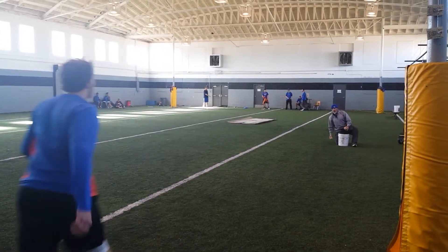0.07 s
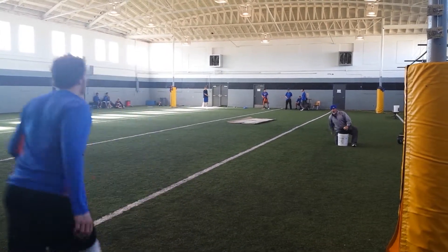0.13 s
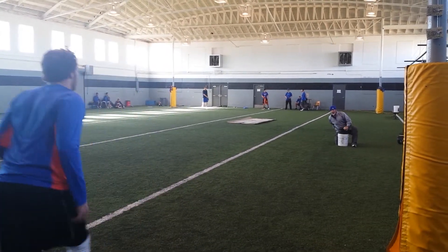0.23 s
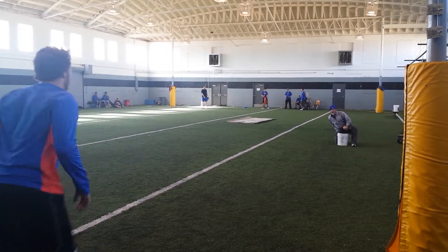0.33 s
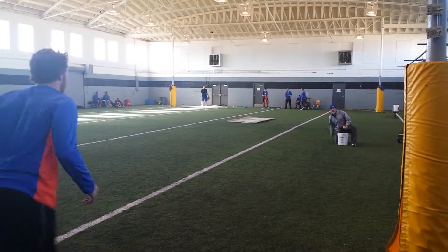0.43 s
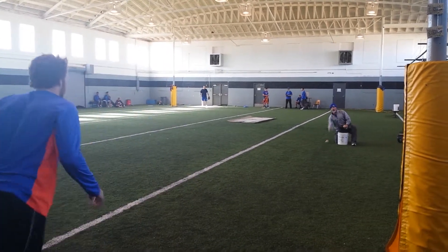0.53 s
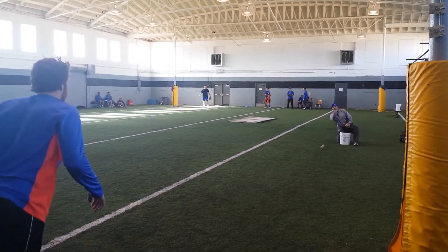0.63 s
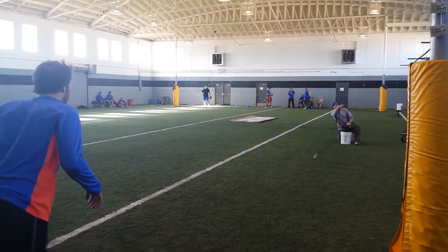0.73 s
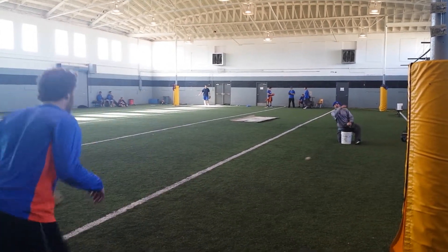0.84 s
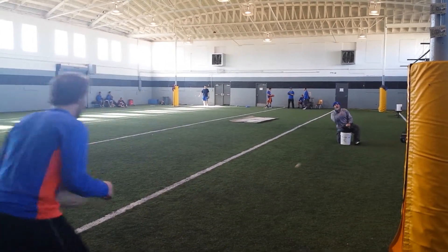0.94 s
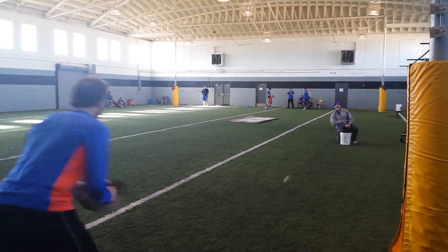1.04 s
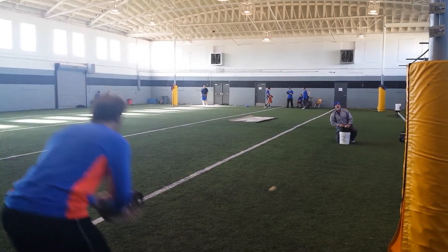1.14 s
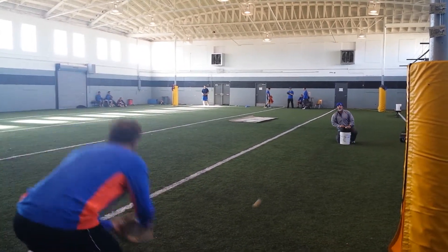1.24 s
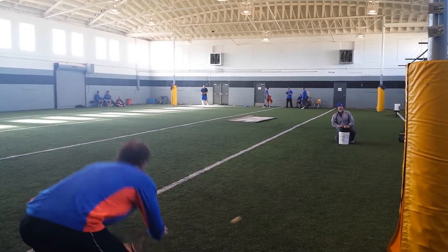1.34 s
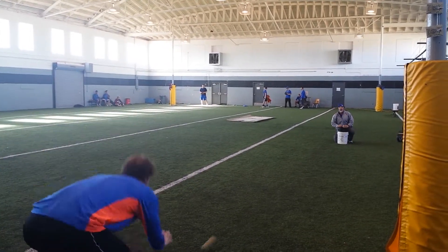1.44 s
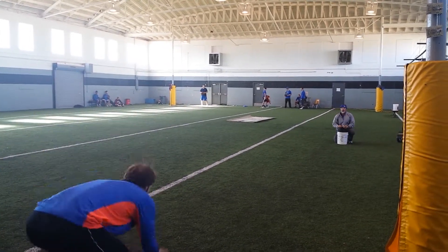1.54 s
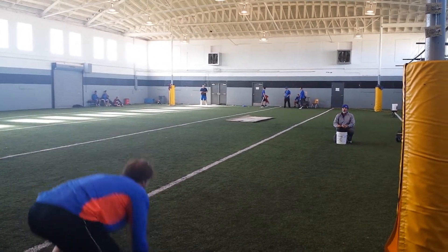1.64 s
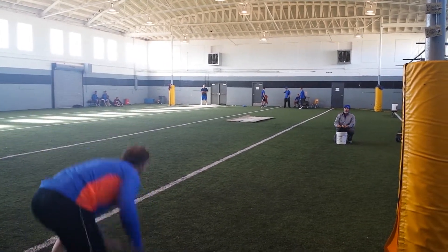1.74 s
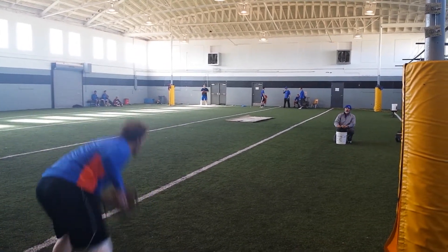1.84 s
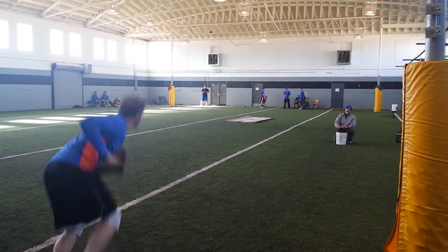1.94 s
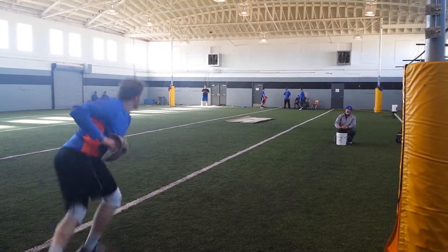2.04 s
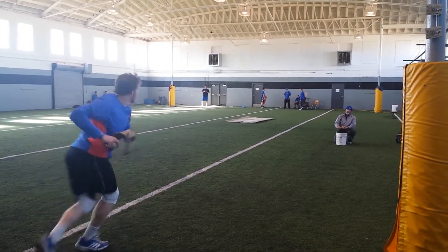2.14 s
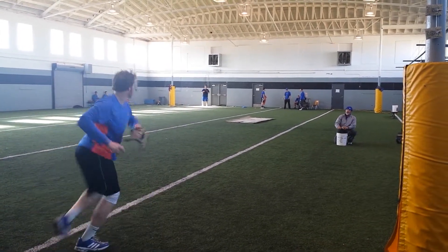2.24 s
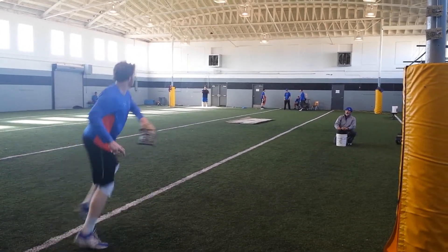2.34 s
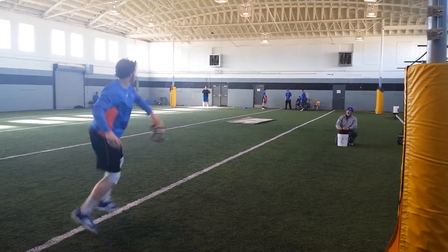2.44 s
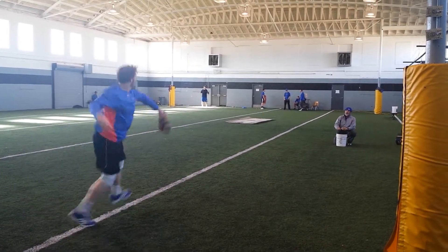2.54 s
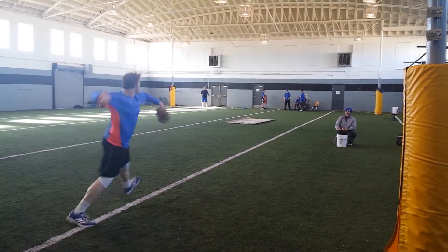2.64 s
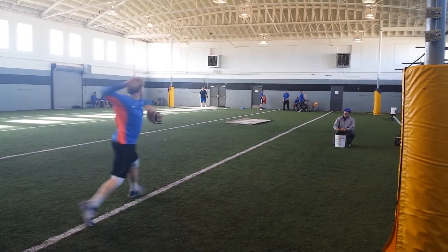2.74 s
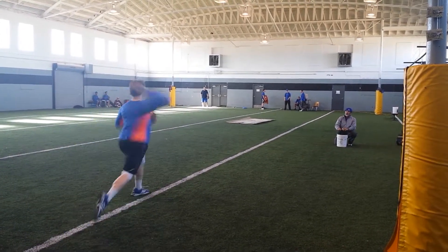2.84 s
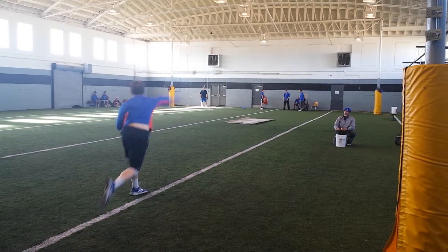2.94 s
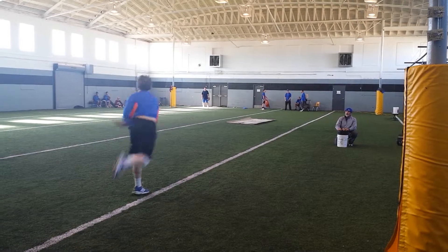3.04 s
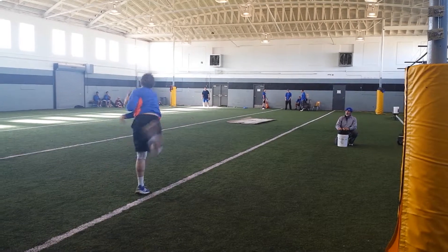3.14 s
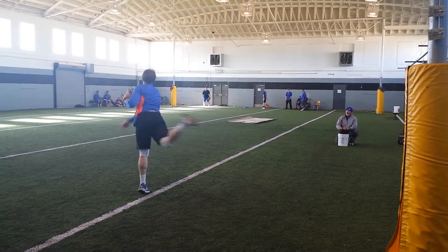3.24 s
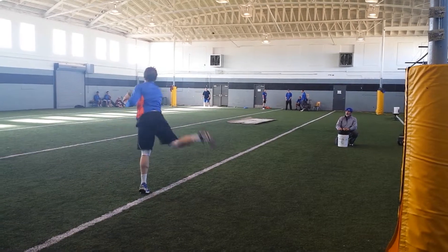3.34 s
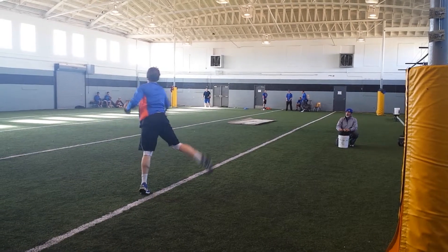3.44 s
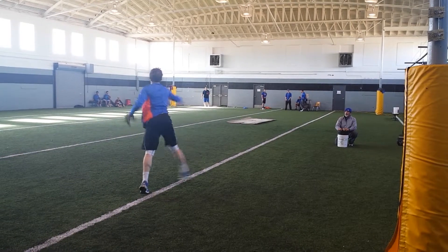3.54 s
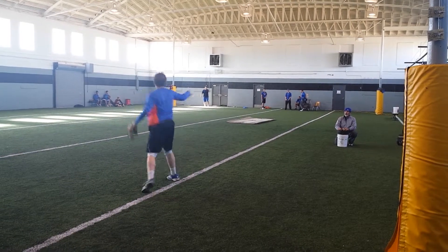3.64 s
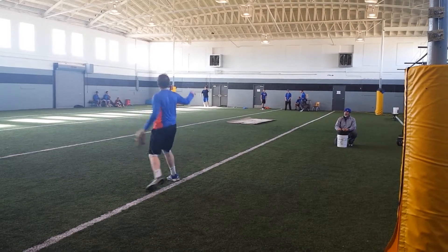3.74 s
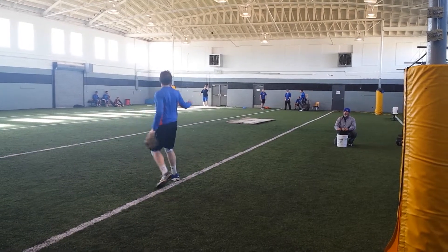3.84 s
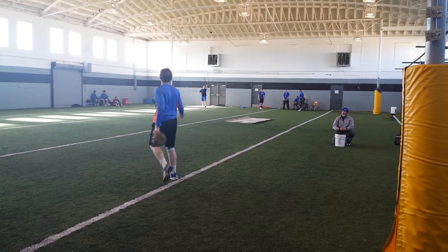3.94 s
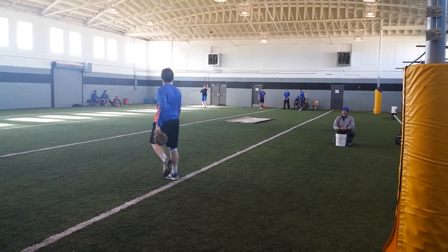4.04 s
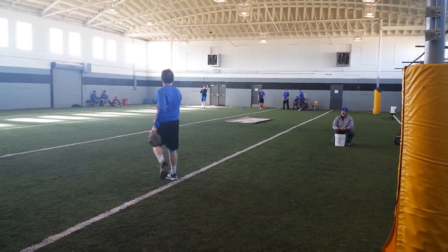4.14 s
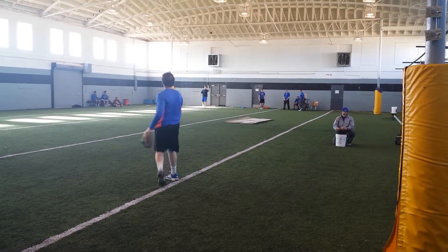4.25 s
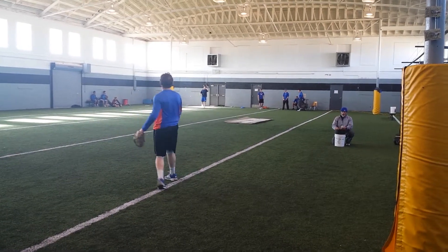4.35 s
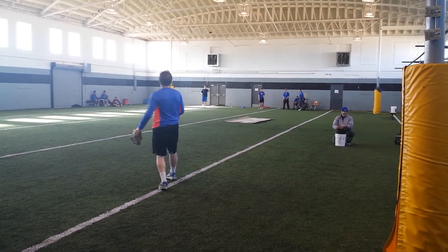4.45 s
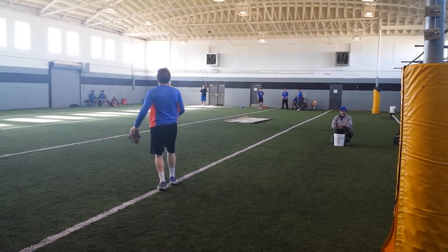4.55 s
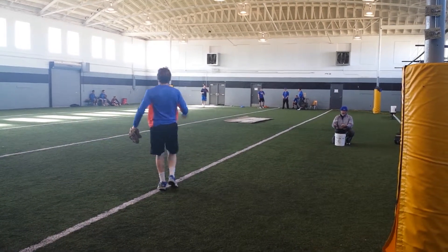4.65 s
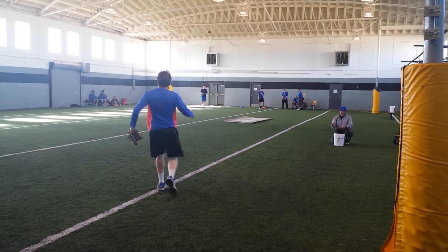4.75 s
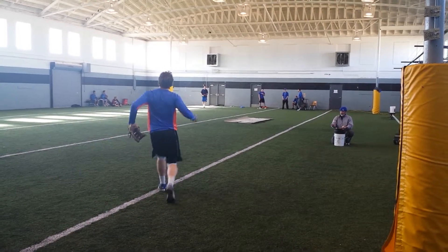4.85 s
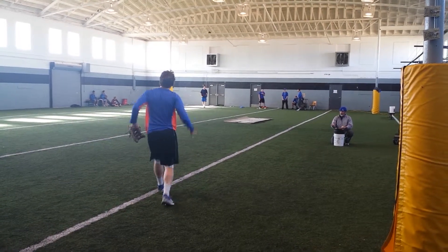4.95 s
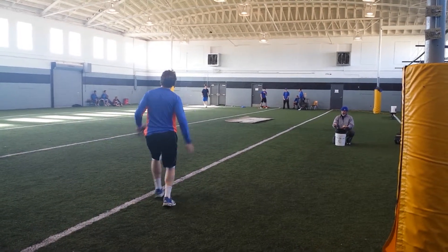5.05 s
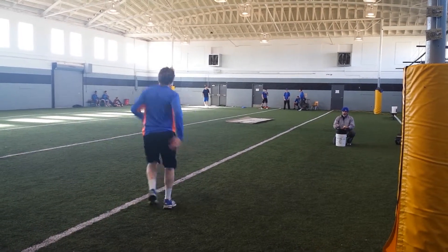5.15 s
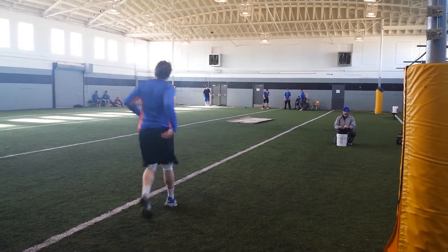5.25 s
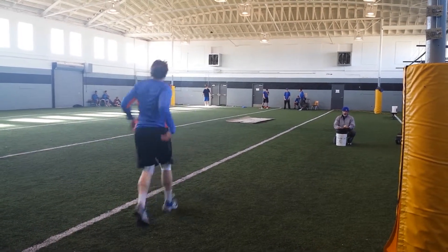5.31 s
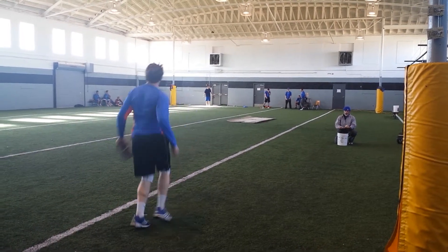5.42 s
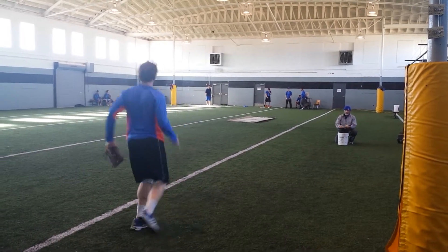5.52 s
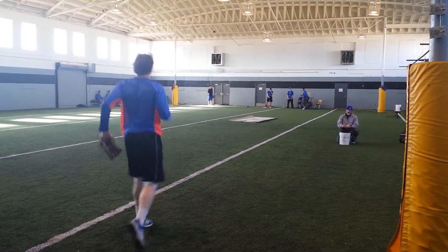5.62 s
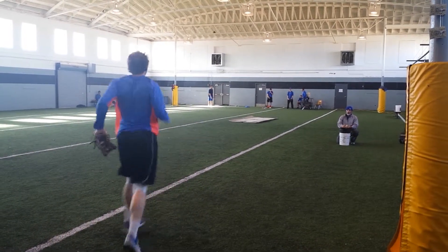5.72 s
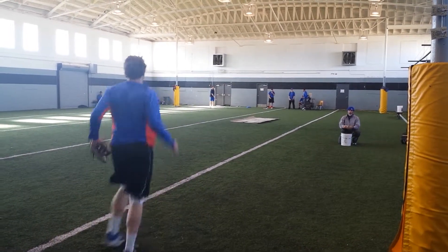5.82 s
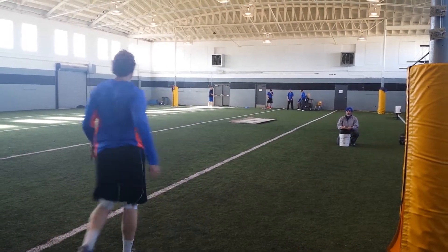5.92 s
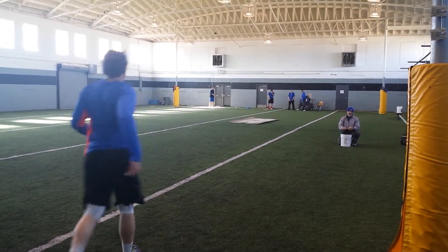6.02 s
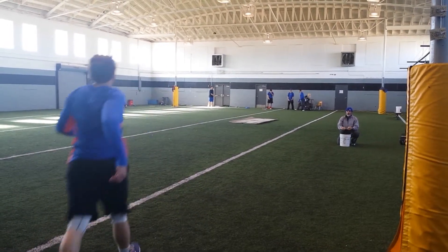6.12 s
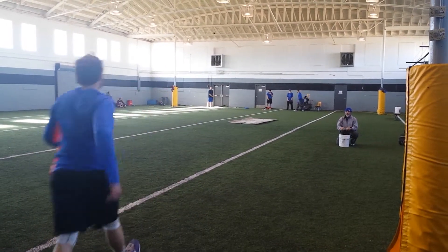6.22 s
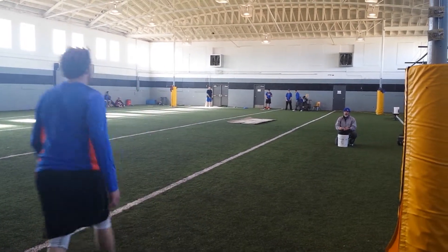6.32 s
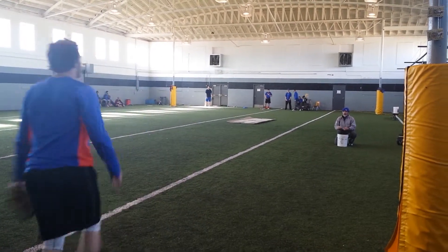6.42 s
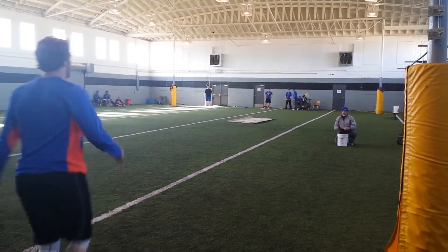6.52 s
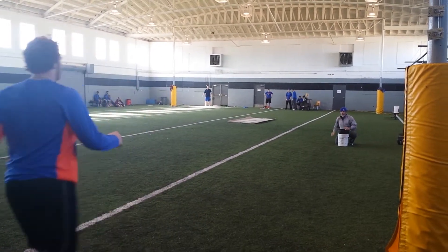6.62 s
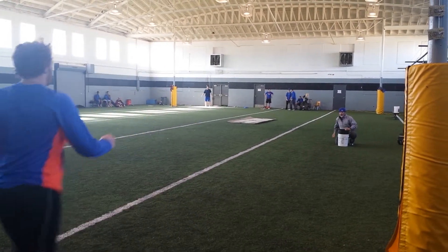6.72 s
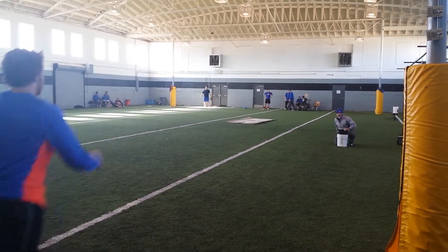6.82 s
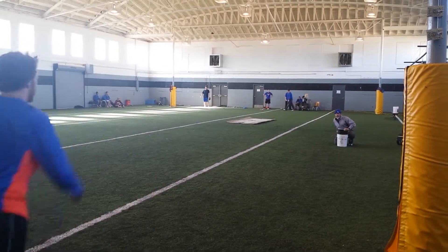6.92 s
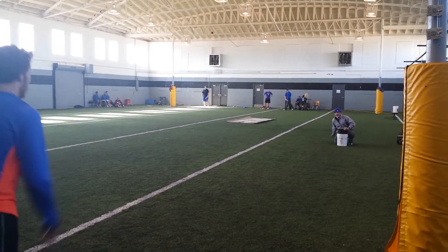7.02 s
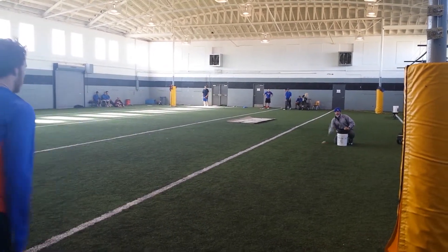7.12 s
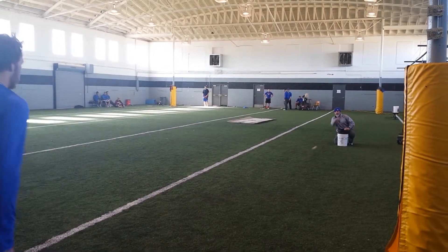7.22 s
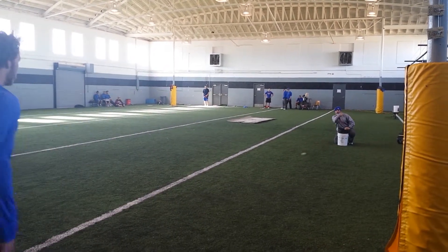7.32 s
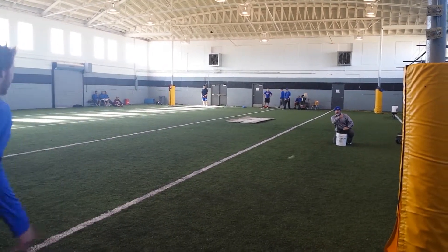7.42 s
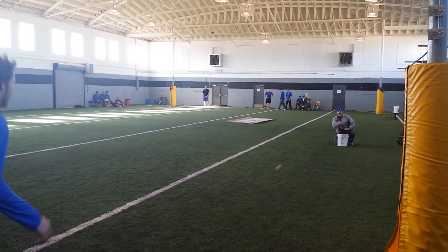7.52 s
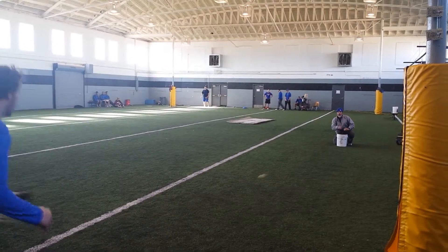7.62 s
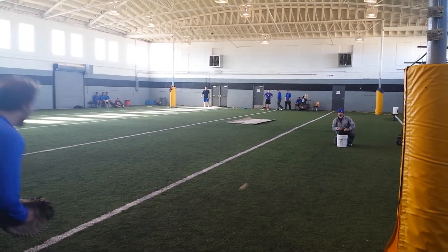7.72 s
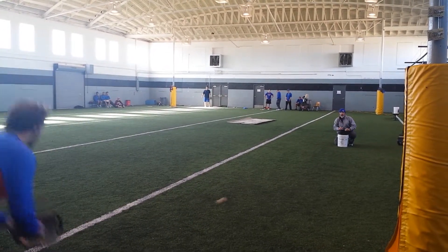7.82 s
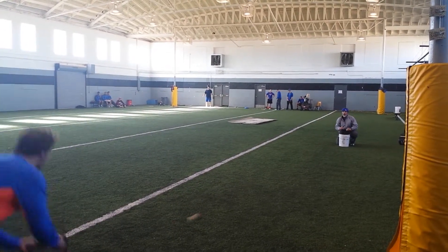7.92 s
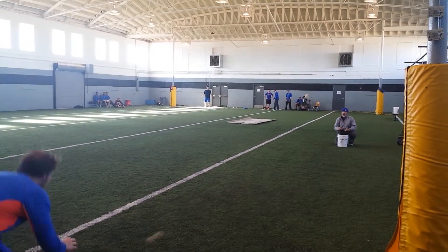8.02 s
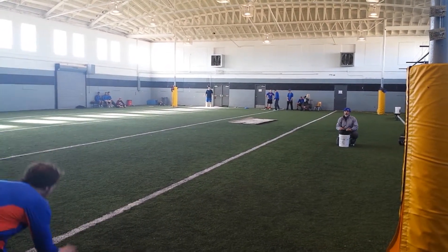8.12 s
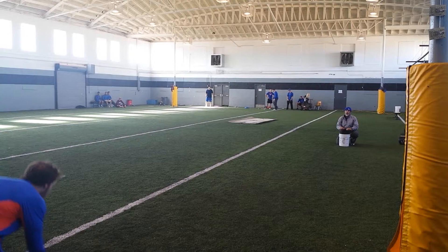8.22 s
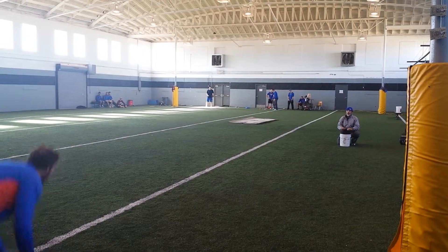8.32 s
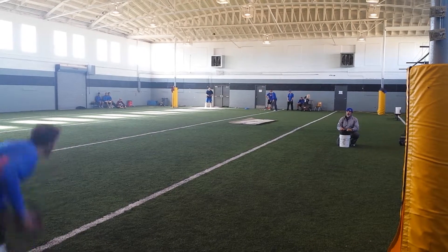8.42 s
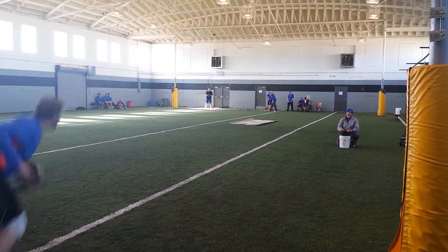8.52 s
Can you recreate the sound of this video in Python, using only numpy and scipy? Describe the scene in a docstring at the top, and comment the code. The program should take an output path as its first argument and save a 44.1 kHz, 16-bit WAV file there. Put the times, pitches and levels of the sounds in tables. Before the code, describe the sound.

Steady ventilation rush and low fan hum in a big hollow hall, shoes scuffing turf, balls hopping into a glove, one sharp echoing crack.

```python
"""Fielding practice on artificial turf in a big hollow hall, stereo.
Throughout, ventilation (filtered noise) rushes and a hum of three harmonics swells as if two fans beat.
Shoes scuff the turf from the start (bursts of tiny ticks); near 1.1 s a ball hops (struck modes and crushed
grass) and then slaps into a glove. At 4.1 s a pitch cracks into a mitt close by, echoes off walls and roof,
and makes the recorder's gain duck. Steps return near 7 s, and a second ball hops and is caught by 8.3 s."""
import sys
import numpy as np
from scipy import signal
from scipy.fft import rfft, irfft, next_fast_len
from scipy.io import wavfile
from scipy.ndimage import uniform_filter1d, minimum_filter1d

SR = 44100
rng = np.random.default_rng(int(sys.argv[2]) if len(sys.argv) > 2 else 0)


def inscribe(sig):
    """Save sig as 16-bit PCM at rate SR to the path in sys.argv[1].

    A 1-D sig is mono; a 2-D sig holds one channel per row.
    Samples are clipped to [-1, 1] before scaling.
    """
    pcm = np.round(np.clip(np.atleast_2d(sig).T, -1, 1) * 32767)
    wavfile.write(sys.argv[1], SR, pcm.astype(np.int16))


N = 377937
TIME = np.arange(N) / SR

# relative spectrum of turf scuffs and of the small ticks: frequency_hz, density_db (per Hz)
TURF_SPECTRUM = [(300, -23), (1000, 15), (3200, 15), (5000, 9.5), (7500, 11), (10000, -1.5), (13000, -9.5),
                 (15000, -22)]


def from_db(db):
    """Decibels are twenty times the logarithm of an amplitude ratio."""
    return 10 ** (np.asarray(db) / 20)


def rms_one(x):
    """Normalise to unit root-mean-square, the measure of mean power."""
    return x / np.sqrt(np.mean(x ** 2) + 1e-20)


def bins(size):
    """Frequencies (Hz) of a real Fourier transform, spaced by the inverse of its duration."""
    return np.maximum(np.arange(size // 2 + 1) * SR / size, 1)


def at_hz(points, hz):
    """Interpolate a table along logarithmic frequency, on which octaves are equal steps."""
    points = np.array(points)
    return np.interp(np.log(hz), np.log(points[:, 0]), points[:, 1])


def add(out, sound, s):
    """Superposition: pressures add, so a stereo sound is summed in at its start time."""
    start = int(s * SR)
    out[:, start:start + sound.shape[1]] += sound[:, :N - start]


def sides(db):
    """Interaural level difference, split evenly into left and right gains."""
    return from_db(np.array([[.5], [-.5]]) * db)


def arrival(hz, lead_ms):
    """Arrival-time difference as a phase turn; a positive lead reaches the left port first."""
    delay_ms = np.maximum([[-lead_ms], [lead_ms]], 0)
    return np.exp(-2j * np.pi * hz * delay_ms / 1000)


def treble_loss(hz, loss_db, corner_hz=1000):
    """Treble absorption: a gain falling by loss_db an octave above a corner (rising if negative)."""
    return from_db(-loss_db * np.log2(np.maximum(hz / corner_hz, 1)))


def resonance(hz, centre_hz, width):
    """Resonance curve of unit height; its half-width at half height is a share of the centre."""
    return 1 / (1 + ((hz - centre_hz) / (width * centre_hz)) ** 2)


def causal(gain):
    """Minimum phase, by folding the cepstrum: a response of this magnitude with nothing before the blow."""
    cepstrum = irfft(np.log(gain + 1e-9))
    half = len(cepstrum) // 2
    cepstrum[1:half] *= 2
    cepstrum[half + 1:] = 0
    return np.exp(rfft(cepstrum))


def ventilation(air_db=-28.5, lead_ms=0.2424):
    """Turbulence is broadband noise, here with coloured bands: part from the left, part from all round."""
    # relative spectrum of the rushing air: frequency_hz, density_db (per Hz)
    air_spectrum = [(20, -33), (40, -19.5), (55, -11), (85, -3), (105, 0), (122, 0.5), (170, -3), (200, -1),
                    (255, -5.5), (315, -6.5), (390, -9.5), (450, -11.5), (700, -14), (1000, -16.5),
                    (1300, -23), (1650, -20.5), (2050, -26.5), (3000, -41.5), (4200, -36.5), (5300, -34.5),
                    (5900, -31.5), (7000, -32), (8300, -40.5), (10300, -49.5), (11800, -61), (14000, -71.5)]
    # narrow hums and broad coloured bands in the rushing air: centre_hz,
    # width_hz (half-width at half amplitude), level_db
    air_bands = [(122.2, 2.6, -40), (291.5, 1.34, -42), (322, 1.5, -43), (366.4, 2.3, -44.5),
                 (388.6, 11, -44), (1890, 15, -57.5), (2125, 300, -50.5), (3144, 520, -52.5),
                 (6100, 140, -56), (6960, 60, -60.5), (10280, 420, -69.5)]
    # power share straight from the ducts on the left: frequency_hz, share (0-1)
    duct_share = [(100, 0.95), (400, 1), (700, 0.96), (1200, 0.67), (1750, 0.88), (2600, 0), (3300, 0.24),
                  (4800, 0), (6000, 0.72), (7400, 0), (9000, 0)]
    size = 2 * next_fast_len(N // 2 + 1)
    hz = bins(size)
    power = (from_db(air_db) * rms_one(from_db(at_hz(air_spectrum, hz)))) ** 2
    for centre_hz, width_hz, level_db in air_bands:
        band = rms_one(1 / (1 + ((hz - centre_hz) / width_hz) ** 2))
        power = power + (from_db(level_db) * band) ** 2
    share = np.clip(at_hz(duct_share, hz), 0, 1)
    white = rfft(rng.standard_normal((3, size)))
    direct = np.sqrt(share) * white[0] * arrival(hz, lead_ms)
    diffuse = np.sqrt(1 - share) * white[1:]
    return irfft((direct + diffuse) * np.sqrt(power))[:, :N]


def fan_hum():
    """Blade-passage harmonics under slow envelopes, heard as two fans drifting in and out of step."""
    # course of the hum: time_s, blade_rate_hz, then blade tone, second and third harmonic
    # before weighting: first_db, second_db, third_db
    hum_course = [(0.1, 72.0, -35, -29.5, -41), (0.17, 71.7, -39, -34.5, -28),
                  (0.96, 72.7, -41, -34.5, -40), (1.24, 71.5, -37, -42, -38), (1.31, 66.9, -39, -34, -39),
                  (1.47, 66.9, -35, -33, -35.5), (1.63, 71.6, -36, -34.5, -32),
                  (2.19, 71.9, -34.5, -32.5, -32), (3.12, 74.1, -29.5, -27, -43.5),
                  (3.38, 72.9, -30, -27, -37.5), (3.96, 73.0, -33, -35, -34), (4.38, 71.5, -29.5, -29, -35),
                  (4.66, 72.2, -35, -35.5, -39.5), (5.54, 71.7, -39.5, -32.5, -30),
                  (6.31, 70.9, -37, -36, -38), (6.43, 72.5, -34, -29.5, -37.5),
                  (7.17, 71.9, -41, -33, -41.5), (7.73, 70.6, -39, -33.5, -44),
                  (8.38, 72.0, -35.5, -38.5, -32.5), (8.45, 71.6, -34, -34, -34)]
    # weights of the three harmonics: weight_db
    harmonic_weights = (-1, -1, -2)
    time_s, *columns = np.transpose(hum_course)
    blade_hz, *levels_db = [np.interp(TIME, time_s, column) for column in columns]
    phase = 2 * np.pi * np.cumsum(blade_hz) / SR
    hum = 0
    for harmonic, (weight_db, level_db) in enumerate(zip(harmonic_weights, levels_db), 1):
        # the root of two makes the decibels root-mean-square levels
        hum = hum + np.sqrt(2) * from_db(weight_db + level_db) * np.sin(harmonic * phase)
    return hum


def light_steps(gap_s=0.52, jitter_s=0.021):
    """Gait is nearly periodic: faint scuffs at an uneven walking pace; rows as for the scuffs."""
    # spells with the fielder near: start_s, end_s
    footwork = [(0.449, 2.7), (7.0, 7.8)]
    level_db, half_s, loss_db, ring_db = -49, 0.013, -3, 0
    return [(s + jitter_s * rng.standard_normal(), level_db, half_s, loss_db, ring_db)
            for start_s, end_s in footwork for s in np.arange(start_s, end_s, gap_s)]


def scuffs(grain_db=2.0, pan_db=1.5, clump_db=2.5, flicks_per_s=9000):
    """Friction as random impulses: grass blades flick past a sole in clumps; a hard plant rings the sole."""
    # shoes brushing the turf: centre_s, level_db (before the swell), half_s (of the swell),
    # loss_db (per octave of treble), ring_db (of the sole)
    brushes = [(0.13, -41, 0.049, 4, 0), (0.843, -44, 0.017, -1, 7), (1.354, -40.5, .0081, -0.5, 4),
               (1.551, -36, 0.01, 0, 7), (1.887, -39.5, 0.036, -2.5, -2), (2.165, -46, .017, -3, -4),
               (2.887, -44, 0.044, 1, -6), (3.009, -40.5, 0.016, 1, -2), (7.413, -44, 0.012, 0, 10),
               (7.807, -33, 0.0087, 0.5, -5), (7.88, -44.5, 0.03, -5, 6), (8.013, -41, 0.014, -1, 8),
               (8.149, -41, 0.013, -2.5, 1), (8.254, -42.5, 0.014, -1, 4), (8.33, -46, 0.024, 5, 0),
               (8.518, -40.5, 0.055, -4, -2)]
    out, hz = np.zeros((2, N)), bins(size=16384)
    t = np.arange(2 * (len(hz) - 1)) / SR
    knots = np.arange(0, t[-1], .002)
    sole = sum(resonance(hz, mode_hz, width=0.12) for mode_hz in (3670, 6060))
    for centre_s, level_db, half_s, loss_db, ring_db in brushes + light_steps():
        clumps_db = clump_db * np.interp(t, knots, rng.standard_normal(len(knots)))
        grains_db = grain_db * np.minimum(rng.exponential(1, len(t)), 4)
        flicks = rng.standard_normal((2, len(t))) * from_db(clumps_db + grains_db)
        # only a random few samples hold a flick
        flicks *= rng.random(len(t)) < flicks_per_s / SR
        colour = from_db(at_hz(TURF_SPECTRUM, hz) + ring_db * sole) * treble_loss(hz, loss_db)
        swish = rms_one(irfft(rfft(flicks) * colour))
        start_s = max(centre_s - t[-1] / 2, 0)
        swell = np.exp(-.5 * ((start_s + t - centre_s) / half_s) ** 2)
        add(out, from_db(level_db) * sides(pan_db) * swish * swell, start_s)
    return out


def slap(colour, length_s, lead_ms, scatter, snap, pan_db=0):
    """Impact: a brief noisy crush, partly different at each port, with a pressure spike at full force."""
    rise_s = 0.00045  # time to full force
    shadow_hz = 2500  # above this the recorder's body shades the far port
    size = 2 * (len(colour) - 1)
    t, hz = np.arange(size) / SR, bins(size)
    force = np.minimum(t / rise_s, 1) * np.exp(-np.maximum(t - rise_s, 0) / length_s)
    crush = rng.standard_normal((3, size)) * force
    scatter = np.clip(scatter, 0, 1)
    ports = np.sqrt(1 - scatter) * crush[0] + np.sqrt(scatter) * crush[1:]
    ports[:, np.argmax(force)] += snap
    shadow = sides(pan_db * hz / np.hypot(hz, shadow_hz))
    sound = irfft(rfft(ports) * causal(colour) * arrival(hz, lead_ms) * shadow)
    return rms_one(sound) * np.sqrt(np.mean(force ** 2))


def knock(modes, favoured_hz, lift_db, lead_ms):
    """Modal excitation: damped modes struck together; the spot that is hit favours those near one pitch."""
    size = 4096
    t = np.arange(size) / SR
    ring = 0
    for mode_hz, level_db, t60_s in modes:
        strength = from_db(level_db + lift_db * resonance(mode_hz, favoured_hz, width=.17))
        decay = np.exp(-np.log(1000) * t / t60_s)
        ring = ring + strength * np.sin(2 * np.pi * mode_hz * t) * decay
    return irfft(rfft(ring) * arrival(bins(size), lead_ms))


def hall_tail(colour, build_s, grain_db, port_gap_ms=0.41, late_bass_hz=250):
    """Diffuse reverberation: builds up, bass last, and dies band by band; alike at both ports only in the bass."""
    # reverberation time of the hall: frequency_hz, t60_s
    hall_t60 = [(200, 0.82), (750, 2.57), (1600, 2), (3200, 0.97), (6500, 0.54), (13000, 0.23)]
    size = 2 * SR
    t, hz = np.arange(size) / SR, bins(size)
    knots = np.linspace(0, t[-1], num=500)
    clumps = rms_one(from_db(grain_db * np.interp(t, knots, rng.standard_normal(len(knots)))))
    mid, side = rfft(rng.standard_normal((2, size)) * clumps)
    # coherence of a diffuse field between two spaced ports
    alike = np.sinc(2 * hz * port_gap_ms / 1000)
    field = np.sqrt((1 + alike) / 2) * mid + np.sqrt((1 - alike) / 2) * side * [[1], [-1]]
    field *= rms_one(from_db(at_hz(colour, hz)))
    centres, out = np.geomspace(150, 14000, num=10), 0
    for centre_hz, weights in zip(centres, np.eye(len(centres))):
        band = irfft(field * np.interp(np.log(hz), np.log(centres), weights))
        band_build_s = build_s * (1 + late_bass_hz / centre_hz)
        build = 1 - np.exp(-np.square(np.square(t / band_build_s)))
        out = out + band * build * np.exp(-np.log(1000) * t / at_hz(hall_t60, centre_hz))
    return out


def ground_balls(room_db=-36.5, echo_db=-29.0, echo_length_s=0.0084, wall_loss_db=0.0):
    """Impact and reflection: hops and glove slaps each knock, crunch, echo off a wall and leave a faint tail."""
    # hops on the turf: start_s, knock_db, favoured_hz, lift_db, crunch_db, crunch_length_s,
    # crunch_peak_hz, crunch_lift_db, left_lead_ms, wall_delay_s
    hops = [(1.1266, -1, 750, 3.5, -20.5, 0.0031, 4470, 6, 0.11, 0.024),
            (7.8066, -4.5, 900, 5.5, -18, 0.0023, 2760, 3.5, 0.058, .029)]
    # slaps into the fielder's glove: columns as for the hops
    catches = [(1.6561, -2, 1930, 14, -18.5, 0.0019, 4270, 6, 0.374, .0268),
               (8.2815, -0.81, 1000, 8, -19, 0.0013, 2600, 12, 0.18, .0278)]
    # ball on turf: frequency_hz, level_db (before the favoured lift), t60_s
    hop_modes = [(370, -19, 0.018), (685, -17.5, 0.017), (840, -17, 0.025), (1630, -20, 0.0088)]
    # ball in the pocket of the glove: columns as for the turf
    glove_modes = [(363, -17, 0.016), (630, -10, 0.0099), (1030, -23.5, 0.02), (1860, -25.5, 0.022)]
    # relative spectrum of crushed grass or leather: frequency_hz, density_db (per Hz)
    crunch_spectrum = [(200, -18), (700, 8), (1400, 5), (2200, -2), (2800, 2.5), (3500, 1.5), (5200, -1),
                       (7600, 3.5), (10500, -18.5), (14000, -28)]
    # relative spectrum of the ball's wall echo and tail: frequency_hz, density_db (per Hz)
    ball_spectrum = [(80, -15), (250, -4), (600, 10.5), (1300, 3), (2500, -6), (3400, -5.5), (5300, -7),
                     (8000, -7), (10500, -23), (14000, -30)]
    out, hz = np.zeros((2, N)), bins(size=4096)
    tail = hall_tail(ball_spectrum, build_s=0.0038, grain_db=0.0)
    off_wall = from_db(at_hz(ball_spectrum, hz)) * treble_loss(hz, wall_loss_db)
    for rows, modes in ((hops, hop_modes), (catches, glove_modes)):
        for (start_s, knock_db, favoured_hz, lift_db, crunch_db, length_s,
             peak_hz, peak_db, lead_ms, wall_s) in rows:
            add(out, from_db(knock_db) * knock(modes, favoured_hz, lift_db, lead_ms), start_s)
            peak = peak_db * resonance(hz, peak_hz, width=.35)
            colour = from_db(at_hz(crunch_spectrum, hz) + peak)
            crunch = slap(colour, length_s, lead_ms, scatter=0.29, snap=1.5)
            add(out, from_db(crunch_db) * crunch, start_s)
            # the wall echo comes from nearly straight ahead
            echo = slap(off_wall, echo_length_s, lead_ms=0.028, scatter=0.24, snap=5.7)
            add(out, from_db(knock_db + echo_db) * echo, start_s + wall_s)
            add(out, from_db(knock_db + room_db) * tail, start_s)
    return out


def ticks(length_s=0.002, lift_db=15, width=0.091, lead_ms=0.027):
    """Short impulses, each peaked in one band: heel and ball touches, and a bright wall echo of the first catch."""
    # small ticks, the one at 1.6833 s being the wall echo: start_s, level_db, peak_hz
    small_ticks = [(1.5482, -29, 3900), (1.6633, -31, 4020), (1.6833, -27.5, 5900), (7.79, -33, 3500),
                   (7.812, -28, 2970), (8.3143, -38, 2700), (8.3264, -32, 2550)]
    out, hz = np.zeros((2, N)), bins(size=4096)
    for start_s, level_db, peak_hz in small_ticks:
        colour = from_db(at_hz(TURF_SPECTRUM, hz) + lift_db * resonance(hz, peak_hz, width))
        tick = slap(colour, length_s, lead_ms, scatter=0.49, snap=4.0)
        add(out, from_db(level_db) * tick, start_s)
    return out


def rafter_echoes(count=20, spread_pan_db=9.0, loss_db=1.0, peak_hz=2400, spread_octaves=0.54, lift_db=7.0):
    """Scattering by roof trusses: small echoes, unevenly spaced, fainter the later; rows as for the echoes."""
    first_s, last_s = .13, .42
    first_db, fade_db_per_s = -33, 30
    delays_s = first_s + (last_s - first_s) * (np.arange(count) + rng.random(count)) / count
    rows = []
    for delay_s, (tint, side) in zip(delays_s, rng.standard_normal((count, 2))):
        level_db = first_db - fade_db_per_s * (delay_s - first_s)
        tinted_hz = peak_hz * 2 ** (spread_octaves * tint)
        rows.append((delay_s, level_db, spread_pan_db * side, loss_db, tinted_hz, lift_db))
    return rows


def pitch_in_mitt(wash_db=-18.0, near_walls_db=-18.5, near_fade_s=0.025, far_wall_db=-23.0, far_wall_s=.205,
                  far_fade_s=0.3, echo_lead_ms=0.086):
    """Room impulse response: the crack, distinct echoes, near-wall boom, wash and a swell from the far end."""
    # crack straight and off the bare wall alongside: delay_s, level_db, loss_db (per octave of treble),
    # peak_hz, lift_db, left_lead_ms, pan_db (treble left minus right)
    crack_paths = [(0, -2, 0, 850, 5, -0.051, -6), (0.0151, -3, -1.5, 1910, 10, -0.326, 2)]
    # leather, then palm: after_s, level_db (within its path), length_s, loss_db (per octave of treble)
    contacts = [(0, 1, 0.00099, -1.5), (.0029, -8, 0.0028, 1.5)]
    # echoes off walls and roof: delay_s, level_db, pan_db (treble left minus right),
    # loss_db (per octave of treble), peak_hz, lift_db
    distinct_echoes = [(0.0225, -11, 4, 4, 800, 6), (.0348, -10.5, 9, 1, 3000, 6),
                       (.0432, -14.5, -3, 0, 3300, 3), (0.064, -20, 9, 0, 6500, 3),
                       (0.111, -16.5, 6, 3, 3100, 11), (.1395, -20.5, 8, 3, 6500, 9),
                       (.1555, -20, 1, 8, 800, 5), (.182, -21.5, 2, 7, 1700, 6),
                       (.2118, -17.5, -1, 3, 7200, 5), (0.2235, -19.5, 3, 10, 1500, 5),
                       (.2355, -19.5, 3, 6, 2000, 4), (0.2532, -16.5, 2, 6, 2100, 6),
                       (0.266, -21, 0, 8, 1800, 4), (.2825, -20.5, 0, 8, 1500, 3),
                       (.3085, -26, 0, 6, 3000, 4), (.329, -24.5, 1, 8, 1600, 5),
                       (.363, -27.5, 0, 8, 3000, 6), (.4305, -19, 1, 20, 750, 11),
                       (0.4532, -24, 3, 22, 1700, 9)]
    # relative spectra, each of frequency_hz, density_db (per Hz): leather pocket, crack as the walls
    # return it, boom off the near walls, wash of the hall, swell from the far end
    leather_spectrum = [(150, -22), (480, -11), (690, 13), (1000, 7), (1250, 3), (1600, 0), (2350, 8),
                        (2950, -16), (3700, 3), (5000, -1.5), (6700, 9), (8000, -3), (9500, -8),
                        (11500, -35), (14000, -33)]
    echo_spectrum = [(150, -27), (480, -2), (720, 11), (1200, 1.5), (2200, -0.5), (3300, -6.5), (4600, -10),
                     (6600, -6), (8500, -17), (11500, -34), (14000, -52)]
    boom_spectrum = [(100, -10), (250, 4), (450, -2), (750, 6), (1300, -14), (3000, -14), (6500, -22),
                     (13000, -55)]
    wash_spectrum = [(100, -13), (240, 6), (350, 2.5), (520, -3.5), (750, 4), (1150, -11.5), (1600, -5.5),
                     (2300, -9), (3300, -8), (4500, -15), (6500, -8.5), (9000, -20), (13000, -46)]
    far_spectrum = [(100, -8), (280, 7), (500, -1), (750, 2), (1200, -4), (2200, -11), (3300, -17),
                    (4800, -21), (7000, -26), (13000, -56)]
    pitch_s, grain_db = 4.0624, 4.0  # instant of the catch; clumpiness of the tails
    out, hz, t = np.zeros((2, N)), bins(size=4096), np.arange(2 * SR) / SR
    leather = from_db(at_hz(leather_spectrum, hz))
    for delay_s, path_db, path_loss_db, peak_hz, lift_db, lead_ms, pan_db in crack_paths:
        heard = leather * from_db(lift_db * resonance(hz, peak_hz, width=0.33))
        for after_s, level_db, length_s, loss_db in contacts:
            colour = rms_one(heard * treble_loss(hz, loss_db + path_loss_db))
            crack = slap(colour, length_s, lead_ms, scatter=0.73, snap=2.8, pan_db=pan_db)
            add(out, from_db(level_db + path_db) * crack, pitch_s + delay_s + after_s)
    for delay_s, level_db, pan_db, loss_db, peak_hz, lift_db in distinct_echoes + rafter_echoes():
        # each surface smears the crack and favours one band
        colour = from_db(at_hz(echo_spectrum, hz) + lift_db * resonance(hz, peak_hz, width=0.18))
        colour = colour * treble_loss(hz, loss_db, corner_hz=2400)
        echo = slap(colour, 0.003, echo_lead_ms, scatter=0.65, snap=3.8, pan_db=pan_db)
        add(out, from_db(level_db) * echo, pitch_s + delay_s)
    boom = hall_tail(boom_spectrum, build_s=0.021, grain_db=grain_db)
    add(out, from_db(near_walls_db) * boom * np.exp(-t / near_fade_s), pitch_s)
    # the wash fills in behind the first echoes
    wash = hall_tail(wash_spectrum, build_s=.034, grain_db=grain_db)
    add(out, from_db(wash_db) * wash, pitch_s)
    swell = hall_tail(far_spectrum, build_s=0.011, grain_db=grain_db)
    add(out, from_db(far_wall_db) * swell * np.exp(-t / far_fade_s), pitch_s + far_wall_s)
    return out


def scene():
    """Linear superposition of the sources in the hall."""
    return ventilation() + fan_hum() + scuffs() + ground_balls() + ticks() + pitch_in_mitt()


def released(cut_db, db_per_s):
    """Peak hold with linear release: a gain cut comes at once and lets go at a steady rate."""
    return np.maximum.accumulate(cut_db + db_per_s * TIME) - db_per_s * TIME


def gain_control(x, threshold_db=-17.0, most_db=3.0, hold_s=0.76, db_per_s=32.0):
    """Compression: a loud sound above the bass turns the gain down; it is held, then creeps back."""
    sensed = signal.sosfilt(signal.butter(2, 500, "high", fs=SR, output="sos"), x)
    power = uniform_filter1d(np.mean(sensed ** 2, axis=0), int(.03 * SR))
    level_db = 10 * np.log10(power + 1e-12)
    hold = int(hold_s * SR) // 2 * 2 + 1
    # the deepest cut of the past hold time
    cut_db = -minimum_filter1d(-np.clip(level_db - threshold_db, 0, most_db), hold, origin=hold // 2)
    pole = np.exp(-1 / (0.085 * SR))  # smoothing time of 0.085 s
    smooth_db = signal.lfilter([1 - pole], [1, -pole], released(cut_db, db_per_s))
    return x * from_db(-smooth_db)


def limiter(x, ceiling=0.85, db_per_s=170):
    """Look-ahead limiting: peaks are seen early and pressed towards the ceiling with all around them."""
    window = int(.004 * SR)  # centred on each sample
    peak = -minimum_filter1d(-np.max(np.abs(x), axis=0), window)
    cut_db = released(20 * np.log10(np.maximum(peak / ceiling, 1)), db_per_s)
    return x * from_db(-uniform_filter1d(cut_db, window))


def record(dry):
    """Transducer chain: port colour, gain control, limiter and a steep low-pass."""
    # the two microphone ports differ in colour: frequency_hz, difference_db (left minus right)
    port_colour = [(100, 1), (400, 2), (1300, .5), (2050, 0), (2350, 3.5), (2650, -2.5), (3050, -2),
                   (3700, 0), (4400, 3), (6800, 3.5), (7700, -6.5), (9300, -6), (11000, -20),
                   (14000, -24.5)]
    size = 2 * next_fast_len(N // 2 + SR // 10)
    heard = irfft(rfft(dry, size) * sides(at_hz(port_colour, bins(size))))[:, :N]
    levelled = limiter(gain_control(heard))
    top_cut = signal.butter(20, 15000, fs=SR, output="sos")
    return signal.sosfiltfilt(top_cut, levelled)


dry = scene()
out = record(dry)
inscribe(out)
```